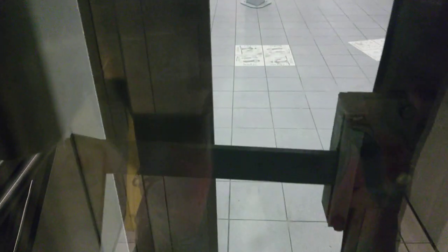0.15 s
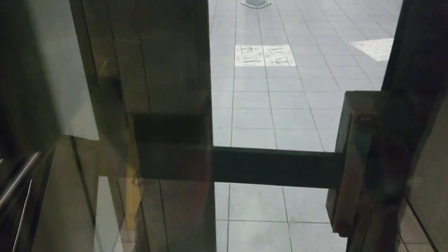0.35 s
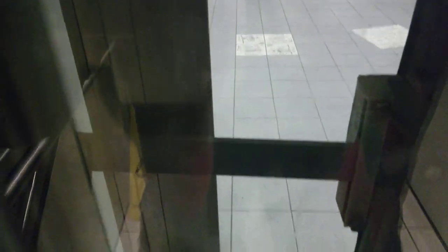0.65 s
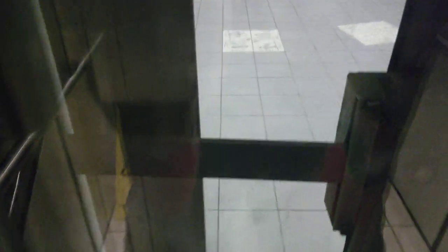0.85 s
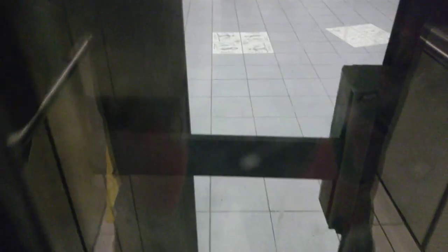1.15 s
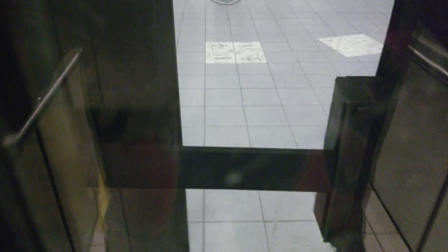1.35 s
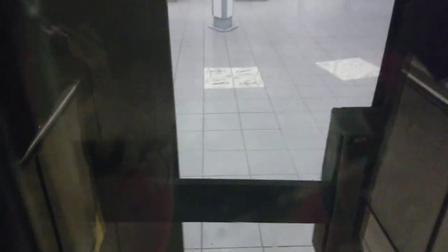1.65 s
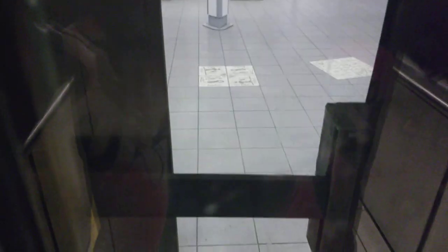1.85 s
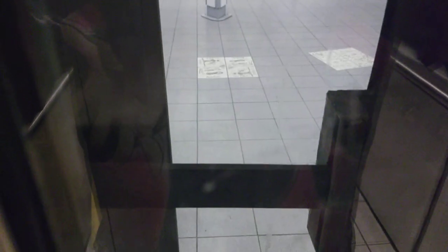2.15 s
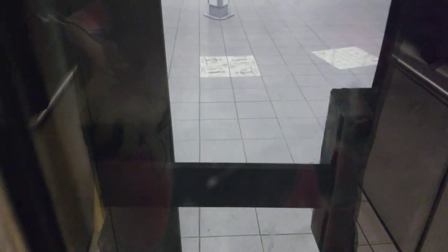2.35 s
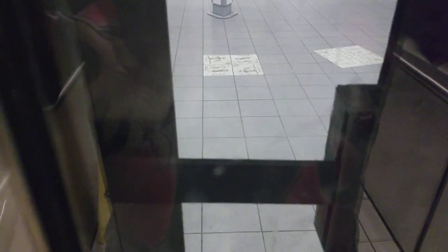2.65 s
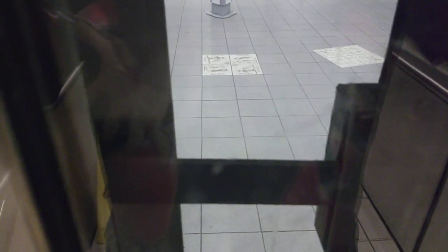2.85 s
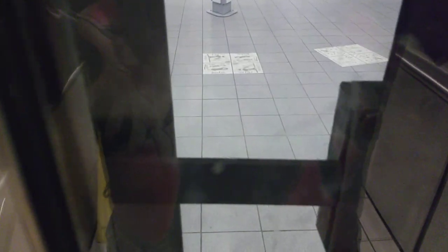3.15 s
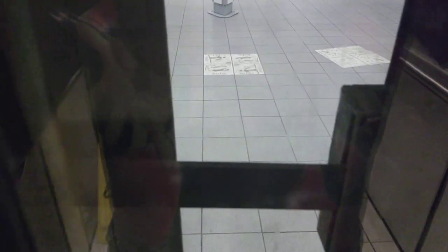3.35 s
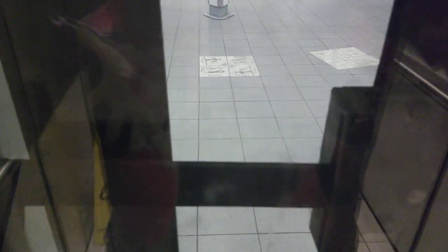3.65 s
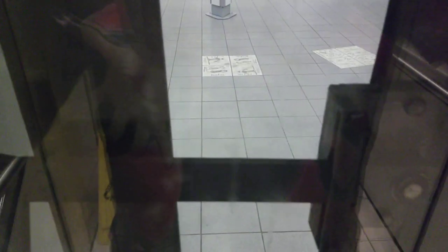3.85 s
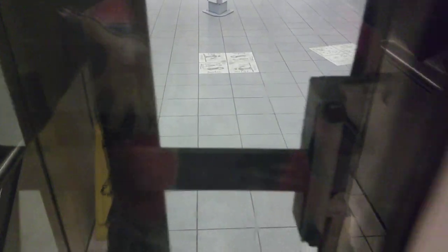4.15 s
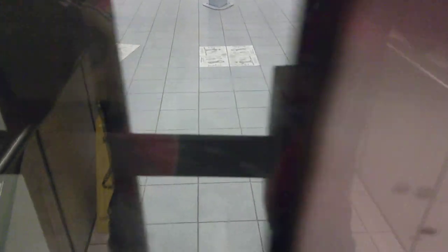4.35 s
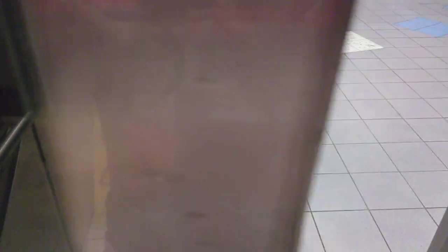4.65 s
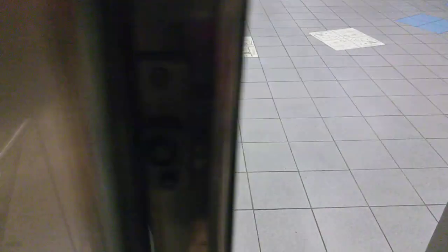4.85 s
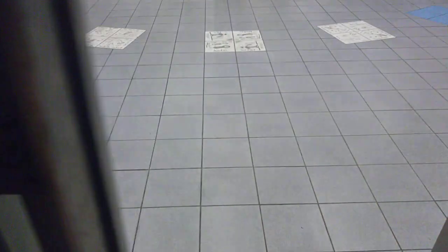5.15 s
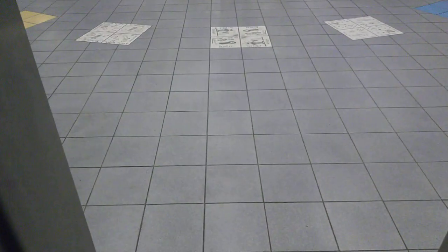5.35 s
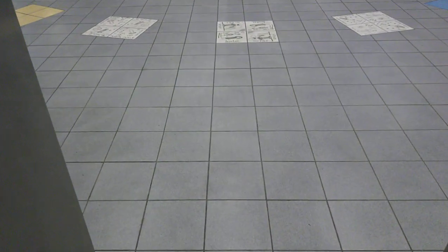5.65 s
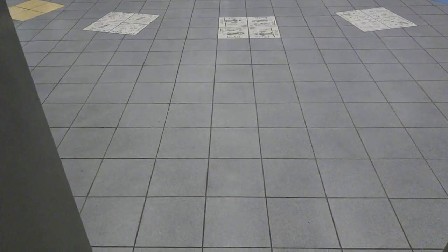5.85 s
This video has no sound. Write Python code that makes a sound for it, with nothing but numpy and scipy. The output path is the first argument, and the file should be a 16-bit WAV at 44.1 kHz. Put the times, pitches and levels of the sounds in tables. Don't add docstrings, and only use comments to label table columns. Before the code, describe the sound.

A heavy metal bang rings and rebounds over humming machinery, then a lift door unlocks with a clank and rolls open, rattling and squeaking.

```python
import sys
import numpy as np
from scipy import signal
from scipy.io import wavfile

SR = 44100
rng = np.random.default_rng(int(sys.argv[2]) if len(sys.argv) > 2 else 0)


def ratio(d):
    e = np.asarray(d, float) / 20
    return 10 ** e


def wav_record(signal):
    frames = np.transpose(np.atleast_2d(signal))
    bounded = np.clip(frames, -1, 1)
    quanta = np.round(bounded * 32767).astype(np.int16)
    wavfile.write(sys.argv[1], SR, quanta)


N = 265041
T = np.arange(N) / SR
STEP_HZ = 7750

# (time [s], peak level [dB], t60 [s], tilt [dB per octave])
CATCH_BLOWS = [(0.0872, -5.5, 0.79, 3.5), (0.4304, -23.5, 1, -3.5), (0.46, -25.5, 1, 9.5),
               (0.532, -22.5, 0.32, -4), (0.9046, -30.5, 0.4, -3), (0.9477, -39, 0.63, -7.5),
               (1.2406, -42, 1, 8), (1.278, -43, 1, -9), (1.5803, -58, 0.54, 13), (1.9979, -64, 0.1, 14),
               (2.5516, -47.5, 0.56, -6)]
# (time [s], peak level [dB], t60 [s], tilt [dB per octave])
DOOR_BLOWS = [
    (4.155, -8.5, 0.28, 1),
]
# (frequency [Hz], side minus mid [dB])
WIDTH = [(30, -28), (60, -23), (130, -14), (290, -13), (630, -10), (1380, 1.5), (3020, -1), (6620, 0)]


def rms_one(x):
    return x / np.sqrt(np.mean(x ** 2) + 1e-20)


def at_hz(points, hz):
    points = np.array(points)
    return np.interp(np.log(hz), np.log(points[:, 0]), points[:, 1])


def drift(rate_hz):
    r = np.exp(-80 * np.pi * rate_hz / SR)
    slow = signal.lfilter([1], [1, -2 * r, r * r], rng.standard_normal(N // 40 + 2002))[2000:]
    return np.interp(np.arange(N) / 40, np.arange(len(slow)), rms_one(slow))


def narrow(x, hz, width_hz):
    r = np.exp(-np.pi * width_hz / SR)
    b = np.array([1, 0, -1]) * (1 - r * r) / 2
    return signal.lfilter(b, [1, -2 * r * np.cos(2 * np.pi * hz / SR), r * r], x)


def damped_swing(x, hz, t60_s, gain=1.0, t_swing=None):
    r, w = ratio(-60 / (t60_s * SR)), 2 * np.pi * hz / SR
    return signal.lfilter([0, gain * np.sin(w)], [1, -2 * r * np.cos(w), r * r], x)


def ringing(blows, modes, level_db, burst_s, spread):
    burst = np.zeros(N)
    for s, db, _, _ in blows:
        i = round(s * SR)
        t = T[:min(N - i, SR // 5)]
        burst[i:i + len(t)] += ratio(db + level_db) * np.exp(-t / burst_s) / np.sqrt(burst_s * SR)
    start = round(blows[0][0] * SR)
    live = slice(start, start + 3 * SR)
    contacts = (burst * rng.standard_normal((2, N)))[:, live] + 1e-18
    out = np.zeros((2, N))
    for hz, db, t60_s in modes:
        for detune, side_db in [(-1, -5), (0, 0), (1.3, -5)]:
            mid, side = damped_swing(contacts, hz * (1 + spread * detune), t60_s, ratio(db + side_db))
            out[:, live] += mid + ratio(at_hz(WIDTH, hz)) * side * [[1], [-1]]
    return out


def struck_steel():
    # (frequency [Hz], level [dB], t60 [s])
    catch_modes = [(634, -2, 0.6), (655, -4, .7), (677, -6.5, 1), (1011, -13, 0.79), (1268, -10, 0.66),
                   (1717, -1.5, 0.6), (1760, -5, 0.5), (1820, -1, 0.68), (2000, -3, 0.68), (2105, -2, 0.6),
                   (2450, -2, 0.32), (2730, -5.5, 0.48), (3060, -10.5, 0.33), (4120, -6.5, 0.36)]
    door_modes = [(338, -8, .6), (404, -9, .45), (592, -10, .3), (1389, -2, .4), (1434, -4, .35),
                  (1609, -1, .33), (2030, -7, .25), (2353, -1, .25), (2449, -1, .25), (3047, -10, .15),
                  (3682, -2, .16), (4705, -15, .15), (5500, -8, .2), (6503, -13, .2)]
    latch_modes = [(1517, -7, 0.06), (1830, -4.5, 0.11), (2320, -4.5, 0.18), (2480, -3.5, 0.095),
                   (3600, -5.5, 0.093), (4000, -10, 0.07), (5450, -15, .06), (6900, -8.5, 0.061)]
    # (time [s], peak level [dB])
    rebounds = [(0.091, -11), (0.104, -11.5), (0.119, -8), (0.135, -7.5), (0.165, -11.5), (0.192, -12),
                (0.214, -16), (0.238, -18.5), (0.275, -18)]
    # (time [s], peak level [dB])
    latch_ticks = [(3.334, -29), (3.38, -35), (3.643, -36), (4.4135, -21), (4.4255, -26), (4.6562, -21),
                   (4.8867, -30), (5.212, -32), (5.8425, -32)]
    rebound_blows = [(s, db, 0, 0) for s, db in rebounds]
    latch_blows = [(s, db, 0, 0) for s, db in latch_ticks]
    out = ringing(CATCH_BLOWS[:1], catch_modes, level_db=-19.0, burst_s=0.057, spread=0.00904)
    out += ringing(rebound_blows, catch_modes, level_db=-22.5, burst_s=0.004, spread=0.02005)
    out += ringing(DOOR_BLOWS, door_modes, level_db=-13, burst_s=0.03, spread=0.0129)
    out += ringing(latch_blows, latch_modes, level_db=-9.5, burst_s=0.0037, spread=0.015)
    return out


def blow_power(s, band_db, t60_s, rise_s):
    i, power = round(s * SR), np.zeros(N)
    t = T[:min(N - i, round(1.3 * t60_s * SR))]
    power[i:i + len(t)] = ratio(band_db) ** 2 * (1 - np.exp(-t / rise_s)) ** 2 * 1e-6 ** (t / t60_s)
    return power


def clatter_power(blows, colour, hz, rise_s, low_longer):
    octaves = np.log2(max(hz, 500) / 2500)
    power = np.zeros(N)
    for s, db, t60_s, tilt in blows:
        band_db = db - 14.5 + at_hz(colour, hz) + tilt * octaves
        power += blow_power(s, band_db, t60_s * 2 ** (-low_longer * octaves), rise_s)
    return power


def tap_power(hz):
    # (time [s], peak level [dB])
    thuds = [
        (0.341, -20.5),
        (0.501, -21),
        (0.571, -25),
        (3.333, -31),
        (3.457, -27),
    ]
    # (time [s], peak level [dB], t60 [s], centre [Hz])
    knocks = [(0.08, -14.5, 0.093, 1520), (3.297, -39, 0.14, 2480), (3.381, -26, 0.51, 2100),
              (3.643, -28, 0.24, 2400), (3.645, -30, .12, 5900), (3.645, -31, .2, 4750),
              (3.83, -35, .3, 2490), (3.457, -26.5, 0.23, 1370), (3.52, -32, .15, 2100),
              (3.555, -33, 0.6, 2000), (4.413, -16.5, 0.088, 7300), (4.414, -23.5, 0.79, 356),
              (4.656, -18.5, 0.3, 1780), (5.14, -18, 0.083, 2580), (5.212, -16, 0.081, 1970),
              (5.357, -22, .067, 2180), (5.59, -35, 0.086, 4600), (5.841, -24.5, 0.14, 4080)]
    # (time [s], peak level [dB], t60 [s], centre [Hz])
    rattles = [(3.333, -43, 0.048, 1810), (3.413, -31, 0.085, 2480), (3.475, -37.5, 0.19, 3200),
               (3.643, -37, 0.1, 5000), (3.825, -36.5, 0.3, 2380), (4.053, -36.5, 0.12, 5200),
               (4.375, -24, 0.14, 2200), (4.412, -21.5, 0.37, 2450), (4.655, -31.5, 0.39, 4970),
               (5.385, -40, 0.66, 6320), (0.77, -39, 0.15, 5270), (1.085, -40, 0.17, 6000),
               (1.33, -41, .1, 4800), (5.668, -32, .25, 4960)]
    taps = [(s, db, 0.21, 148, 0.5) for s, db in thuds]
    taps += [(*row, 0.27) for row in knocks]
    taps += [(*row, 1.1) for row in rattles]
    power = np.zeros(N)
    for s, db, t60_s, centre_hz, octaves in taps:
        off_db = -6 * (np.log2(hz / centre_hz) / octaves) ** 2
        if off_db > -40:
            power += blow_power(s, db - 16.0 + off_db, max(t60_s, .02), rise_s=0.0012)
    return power


def slip_tone(track, multiples, levels_db, wobble, flutter_db):
    grain_share, grain_hz, fade_s = .28, 140, .008
    s, hz, db = np.transpose(track)
    live = slice(round(s[0] * SR), round(s[-1] * SR))
    t, out = T[live], np.zeros(N)
    pitch_hz = np.interp(t, s, hz) * (1 + wobble * drift(67.0)[live])
    phase = 2 * np.pi * np.cumsum(pitch_hz) / SR
    fade = np.clip(np.minimum(t - s[0], s[-1] - t) / fade_s, 0, 1)
    low_pass = signal.butter(2, grain_hz, fs=SR, output="sos")
    for m, partial_db in zip(multiples, levels_db):
        grain = grain_share * rms_one(signal.sosfilt(low_pass, rng.standard_normal((2, len(t)))))
        rough = np.sin(m * phase) * (1 + grain[0]) + np.cos(m * phase) * grain[1]
        rough /= np.sqrt(1 + 2 * grain_share ** 2)
        out[live] += ratio(partial_db + flutter_db * drift(40.0)[live]) * rough
    out[live] *= np.sqrt(2) * ratio(np.interp(t, s, db)) * fade
    return out


def squeals():
    squeal = [(3.65, 1950, -63), (3.71, 1924, -52.5), (3.785, 1980, -56), (3.8, 2040, -44),
              (3.842, 2058, -34), (3.88, 2014, -48), (3.9, 2033, -50), (3.94, 2070, -47), (3.98, 2040, -64)]
    squeal_partials_db = [1, -12, -16.5, -12, -24, -23, -22]
    short_squeal = [(3.982, 3260, -60), (4.01, 3220, -44.5), (4.06, 3140, -56.5), (4.14, 3110, -72)]
    short_partials_db = [3, -9, -6, -15]
    run_up = [(4.29, 5640, -52), (4.32, 5800, -54), (4.328, 6020, -44), (4.35, 6120, -40),
              (4.366, 6100, -56), (4.372, 6950, -52), (4.4, 7000, -49), (4.48, 7000, -60)]
    creak = [(4.69, 1808, -47), (4.7, 1714, -38), (4.766, 1817, -33.5), (4.86, 1765, -39),
             (4.886, 1662, -37), (4.956, 1600, -39.5), (4.966, 1832, -85), (5.0, 1706, -32)]
    creak_partials_db = [-14, -13, -8, -18]
    shriek = [(4.915, 5620, -46), (4.946, 5710, -38), (4.97, 5650, -36), (4.994, 5619, -29),
              (5.03, 5610, -37), (5.055, 5600, -50), (5.09, 5540, -58), (5.11, 5500, -66)]
    # (start [s], length [s], start pitch [Hz], glide [%],
    # level [dB])
    squeaks = [(3.64, 0.2, 5900, 0, -53), (4.43, .07, 11860, 4.5, -36), (4.453, 0.1, 12640, 4, -37),
               (5.4, 0.12, 16000, -5, -45), (5.05, 0.1, 14300, -7.5, -32), (5.385, 0.1, 5250, 1.5, -43.5),
               (5.422, 0.066, 7450, 0, -42), (5.45, 0.091, 4800, -8, -59), (5.576, 0.13, 1950, 1, -45),
               (5.382, .04, 4850, 1.5, -45), (5.654, 0.12, 6240, -4.5, -50), (5.715, .04, 5300, 0, -47),
               (5.4, 0.082, 11800, 0, -40), (5.39, .05, 13000, 0, -38), (5.375, .04, 8100, -2, -49),
               (5.685, .05, 13300, -1.5, -39), (5.67, 0.1, 4500, -3, -43), (3.815, .05, 3870, 0.5, -45),
               (3.5, 0.065, 2000, -3.5, -41), (5.684, 0.11, 7380, -6, -40), (5.675, 0.047, 8860, 3, -28.5),
               (5.762, 0.048, 9100, -1.5, -36.5)]
    more_squeaks = [(4.5, .17, 7800, -2.8, -40), (5.012, .035, 5420, -.5, -40),
                    (5.052, .04, 7450, -3, -44), (5.112, .035, 7480, -3.5, -41)]
    out = slip_tone(squeal, range(1, 8), squeal_partials_db, wobble=.009, flutter_db=2.5)
    out += slip_tone(short_squeal, range(1, 5), short_partials_db, wobble=.004, flutter_db=2)
    out += slip_tone(run_up, [1], [0], wobble=.006, flutter_db=3.5)
    out += slip_tone(creak, np.arange(1, 5) / 3, creak_partials_db, wobble=0.003, flutter_db=2.0)
    out += slip_tone(shriek, [1, 2], [0, -15], wobble=.004, flutter_db=1.5)
    share = np.array([0, 0.28, 1])
    for start, length, hz, glide, db in [*squeaks, *more_squeaks]:
        pitch_hz = hz * (1 + glide / 100 * share)
        track = np.transpose([start + length * share, pitch_hz, [db - 13, db, db - 17.5]])
        out += slip_tone(track, [1], [0], wobble=.005, flutter_db=3)
    return out


def cab(x):
    t60_s, level_db = 0.3, -2
    t = T[:SR // 2]
    echo = rng.standard_normal((2, len(t))) * 0.00085 ** (t / t60_s) * (t > .002)
    echo /= np.sqrt(np.sum(echo ** 2, axis=1, keepdims=True))
    return ratio(level_db) * signal.fftconvolve(x[None], echo, axes=1)[:, :N]


def pushes():
    # (time [s], peak level [dB])
    floor_pushes = [
        (3.334, -21),
        (3.4575, -18.5),
        (3.485, -23.5),
        (4.437, -24.5),
    ]
    low, high = np.zeros((2, N)) + 1e-18
    for s, db in floor_pushes:
        low[round(s * SR)] = -ratio(db)
    high[round(5.607 * SR)] = ratio(-15)
    snap = signal.sosfilt(signal.butter(2, 3500, "high", fs=SR, output="sos"), high)
    return damped_swing(low, hz=166, t60_s=0.015) + snap


def gear():
    # (time [s], rolling level [dB])
    motion = [(0.0, -47), (0.1, -41.5), (0.7, -39), (1.4, -45), (2.8, -49), (3.28, -48), (3.38, -40),
              (4.1, -42.5), (4.3, -33), (4.9, -32), (5.4, -30), (5.7, -33), (6.01, -36.5)]
    # (time [s], rolling level [dB], sliding level [dB], t60 [s])
    hall_echoes = [
        (0.09, -25.5, -46, 1.54),
        (4.156, -20.5, -22, 0.88),
    ]
    # (time [s], peak level [dB], rise [s], t60 [s])
    puffs = [(3.64, -45, 0.0028, 0.15), (3.79, -51, 0.014, 0.18), (3.99, -89, 0.0043, 0.24),
             (4.152, -36.5, 0.0015, 0.4), (4.402, -46, 0.0031, 0.73), (4.75, -46, 0.16, 1),
             (5.0, -42, 0.019, 0.5), (5.38, -41, .005, 0.41), (5.68, -46.5, 0.0036, 0.61),
             (5.77, -47.5, 0.0073, 0.44)]
    slide_under_roll_db, slide_lag_db_per_s, braking_s = 10, 5.5, 4.83
    echo_rise_s = 0.019
    motion_db = np.interp(T, *np.transpose(motion))
    slide_db = motion_db - slide_under_roll_db - slide_lag_db_per_s * np.maximum(T - braking_s, 0)
    roll, hiss, swish = ratio(motion_db) ** 2, ratio(slide_db) ** 2, np.zeros(N)
    for s, roll_db, hiss_db, t60_s in hall_echoes:
        roll += blow_power(s, roll_db, t60_s, echo_rise_s)
        hiss += blow_power(s, hiss_db, t60_s / 2, echo_rise_s / 2)
    for s, db, rise_s, t60_s in puffs:
        swish += blow_power(s, db, t60_s, rise_s)
    return np.sqrt([roll, hiss, swish])


def noisy_parts():
    # (frequency [Hz], level per band [dB])
    catch_clatter = [(150, -45), (300, -19), (450, -19.5), (650, -11), (850, -14), (1200, -7.5),
                     (1800, -2.5), (2500, -5), (3300, -13.5), (4200, -11.5), (6000, -12), (9000, -21),
                     (13000, -22.5)]
    door_clatter = [(60, -44), (150, -63), (340, -9.5), (600, -17.5), (900, -18), (1450, -9.5),
                    (2400, -0.5), (3200, -14), (3800, -30), (5600, -7), (7000, -4), (9000, -5),
                    (13000, -14)]
    roll_colour = [(120, -94), (300, -17), (600, -22), (900, -15.5), (1300, -20), (1900, -13.5),
                   (2600, -20), (3300, -38), (5000, -108)]
    hiss_colour = [(1500, -27), (2600, -17.5), (3300, -17.5), (4400, -13), (5500, -11.5), (7000, -11),
                   (9500, -17), (13000, -16)]
    swish_colour = [(3300, -30), (4500, -26), (5500, 0), (7200, 0.5), (9500, 8), (11500, 2.5),
                    (13500, -1.5)]
    air = [(25, -56), (50, -64), (75, -47), (100, -60), (130, -52), (270, -51), (400, -60.5), (700, -54.5),
           (950, -72.5), (1900, -57), (2600, -76.5), (3300, -73), (6300, -100), (7400, -73.5), (12000, -71)]
    # (frequency [Hz], left minus right [dB])
    lean = [(60, 0.2), (180, 0.5), (540, 1), (1610, 0), (4840, 0), (9000, -2.5)]
    bumps = ratio(0.5 * drift(43))
    roll, hiss, swish = gear() * bumps
    rattle = ratio(0.83 * drift(61)) ** 2
    out, white = np.zeros((2, N)), rng.standard_normal((2, 2, N + SR // 2))
    edges_hz = STEP_HZ * 2 ** (np.arange(-25, 4) / 3)
    for k, (low, high) in enumerate(zip(edges_hz, edges_hz[1:])):
        hz = np.sqrt(low * high)
        order = 2 if hz < STEP_HZ else 5
        band = signal.butter(order, [low, high], "band", fs=SR, output="sos")
        mid, side = signal.sosfilt(band, white[k % 2])[:, -N:]
        blows = clatter_power(CATCH_BLOWS[:1], catch_clatter, hz, rise_s=0.0098, low_longer=0.47)
        blows += clatter_power(CATCH_BLOWS[1:], catch_clatter, hz, rise_s=0.00061, low_longer=0.47)
        blows += clatter_power(DOOR_BLOWS, door_clatter, hz, rise_s=0.00029, low_longer=0.81)
        power = rattle * (blows + tap_power(hz))
        power += (roll * ratio(at_hz(roll_colour, hz))) ** 2
        power += (hiss * ratio(at_hz(hiss_colour, hz) + 2.0 * drift(5.3))) ** 2
        power += (swish * ratio(at_hz(swish_colour, hz) + 0.94 * drift(17))) ** 2
        power += ratio(at_hz(air, hz)) ** 2
        gain = np.sqrt(power * SR / 2 / (high - low)) * ratio(1.43 * drift(3.8))
        balance = ratio(at_hz(lean, hz) * np.array([[.5], [-.5]]))
        out += gain * balance * (mid + ratio(at_hz(WIDTH, hz)) * side * [[1], [-1]])
    return out


def whines():
    # (frequency [Hz], start level [dB], fade [dB per s])
    drive_whines = [(719, -53, 1.4), (1119, -60.5, 0), (1960, -63, 0)]
    out = np.zeros((2, N))
    for hz, db, fade in drive_whines:
        phase = 2 * np.pi * np.cumsum(hz * (1 + .0008 * drift(3))) / SR
        ear_phase = at_hz([(500, 0), (2000, .8)], hz) * np.array([[1], [-1]])
        out += np.sqrt(2) * ratio(db - fade * T + 2.5 * drift(3.5)) * np.sin(phase + ear_phase)
    return out


def hums():
    # (frequency [Hz], width [Hz], level [dB])
    fan_hums = [(80, 14, -54), (119, 8, -55), (274, 22, -51)]
    out = np.zeros((2, N))
    for hz, width_hz, db in fan_hums:
        mid, side = narrow(narrow(rng.standard_normal((2, N)), hz, width_hz), hz, width_hz)
        out += ratio(db) * (rms_one(mid) + ratio(at_hz(WIDTH, hz)) * rms_one(side) * [[1], [-1]])
    return out


def scene():
    tones = squeals()
    near = tones * ratio(np.array([[-1.5], [1.5]]))
    return struck_steel() + near + cab(tones) + pushes() + noisy_parts() + whines() + hums()


def top_cut(x):
    return signal.sosfilt(signal.butter(12, 14500, fs=SR, output="sos"), x)


def record(dry):
    dips_hz = [3150, 3400, 3750, 4150, 4600, 6600]
    top_hz, top_db = 14400, -16
    out = signal.sosfilt(signal.ellip(9, .5, 55, STEP_HZ, fs=SR, output="sos"), dry)
    out -= .2 * narrow(out, 3280, 300)
    for hz in dips_hz:
        out -= np.clip(3 * (drift(9) - 1.2), 0, 1) * narrow(out, hz, 170)
    edges_hz = np.linspace(STEP_HZ * 1.06, top_hz, 15)
    gaps = [drift(7) for _ in edges_hz[::3]]
    for k, (low, high) in enumerate(zip(edges_hz, edges_hz[1:])):
        strip = signal.sosfilt(signal.ellip(4, .5, 50, [low, high], "band", fs=SR, output="sos"), dry)
        kept = np.clip(6 * (.6 * drift(9) + .7 * gaps[k // 3] + .45), 0, 1)
        out += ratio(top_db) * kept * strip
    return top_cut(out)


dry = scene()
out = record(dry)
wav_record(out)
```